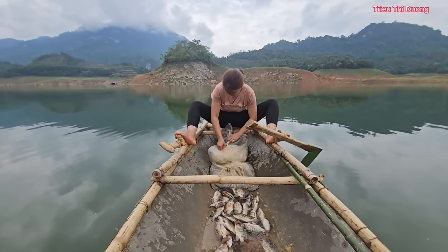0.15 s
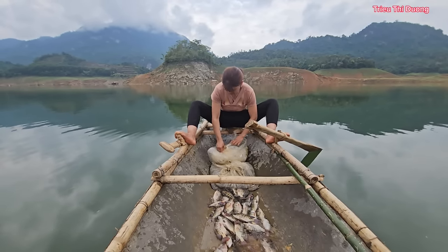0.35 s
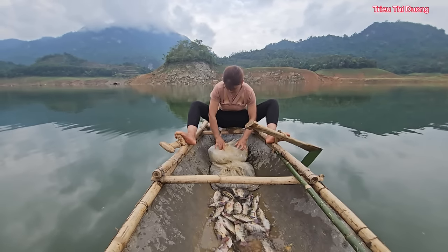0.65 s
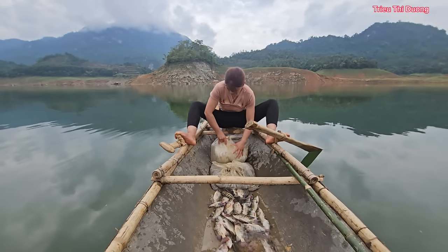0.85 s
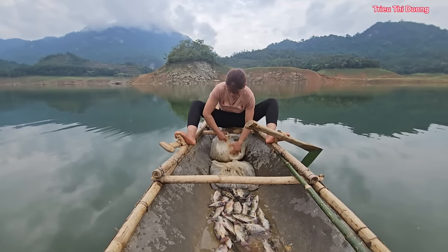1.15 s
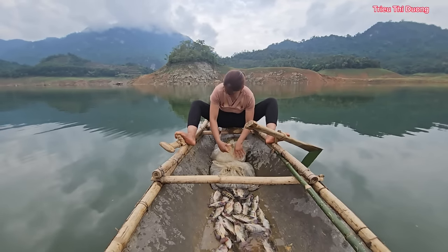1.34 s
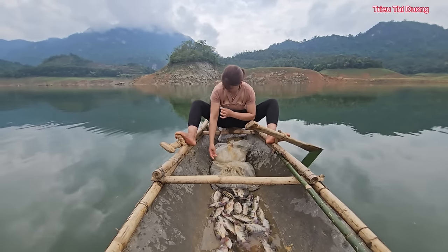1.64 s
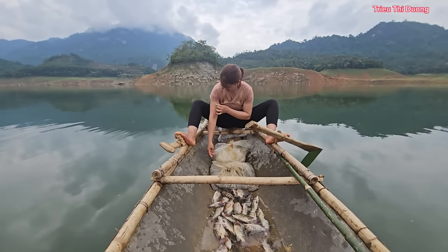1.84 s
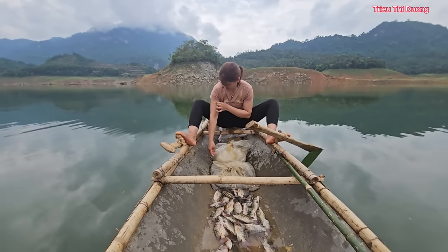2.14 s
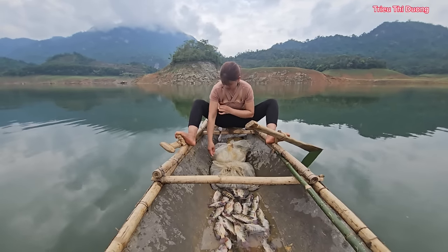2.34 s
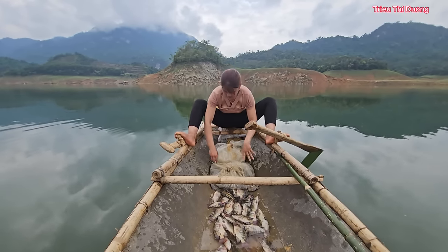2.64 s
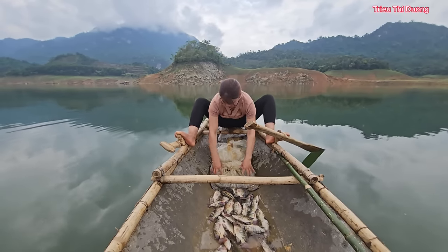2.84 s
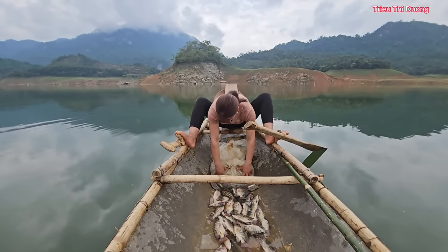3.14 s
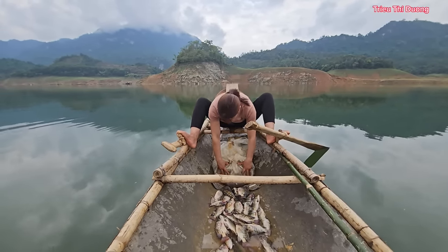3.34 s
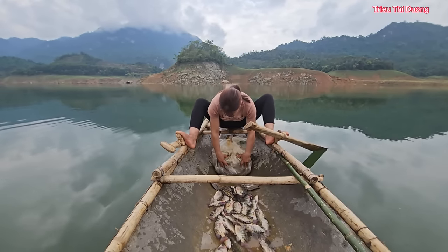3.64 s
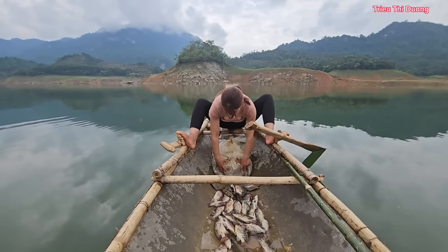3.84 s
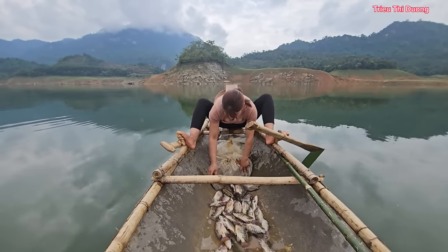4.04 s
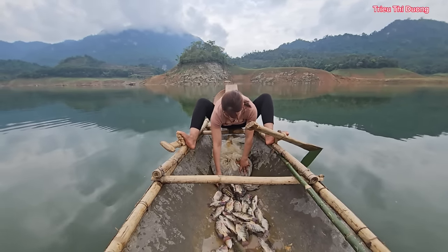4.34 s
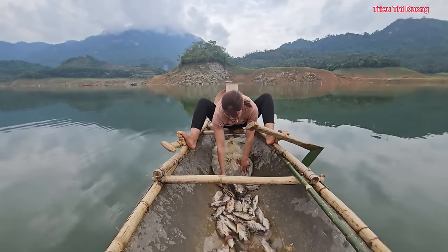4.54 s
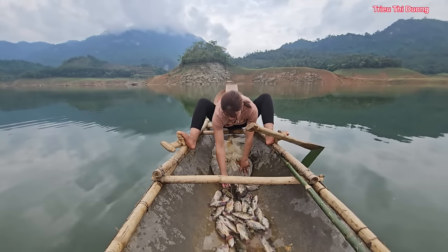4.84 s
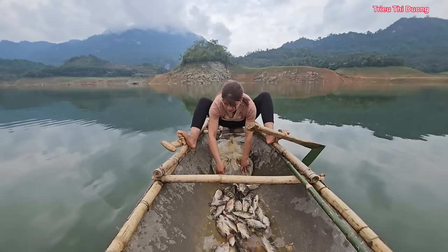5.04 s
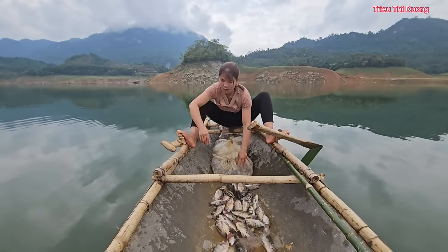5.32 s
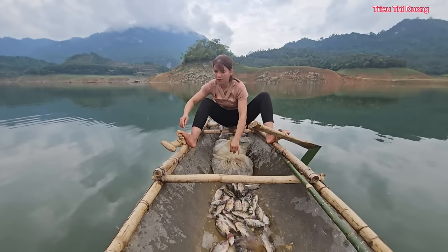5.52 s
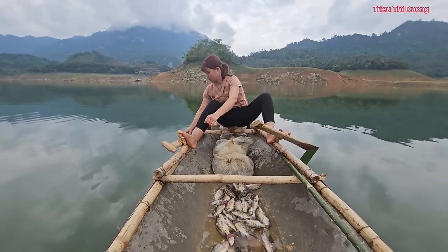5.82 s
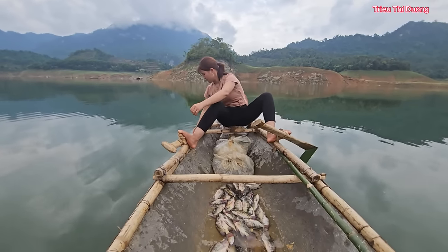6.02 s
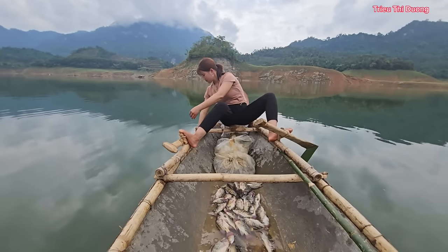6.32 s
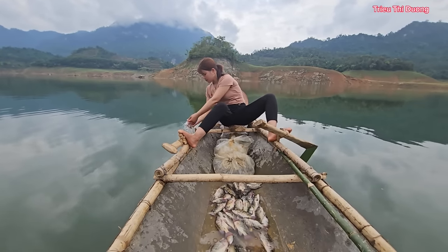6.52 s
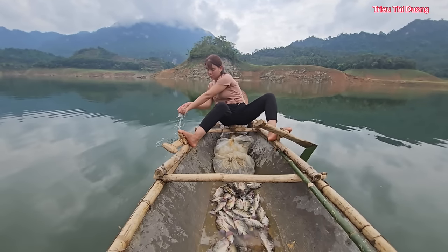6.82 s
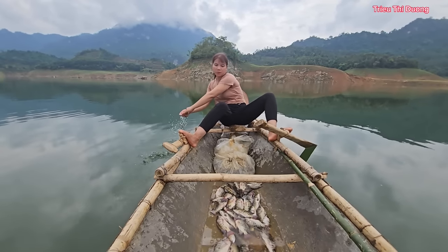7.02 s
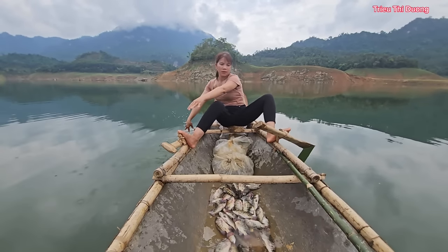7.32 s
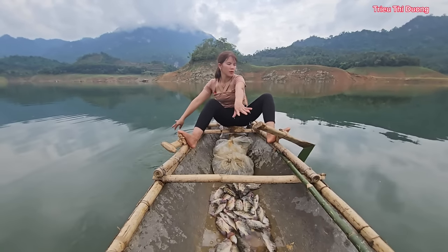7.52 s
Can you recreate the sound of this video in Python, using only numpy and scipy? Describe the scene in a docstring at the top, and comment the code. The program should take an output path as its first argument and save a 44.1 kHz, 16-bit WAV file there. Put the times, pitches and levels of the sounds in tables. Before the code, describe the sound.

Near microphones in a small boat on an open lake catch sodden net being pushed about, with fizzing wet crackle, sharp ticks and dull hull thumps, loudest early and again more gently midway. Plops and tiny bubbles follow as water drains, then droplets patter and ping from rinsed hands. Far away, an engine putters dully, insects hold a high steady shrill, birds whistle faintly and a low wavering hum rises late.

```python
"""Wet net in a small boat

A wet fishing net is shoved along the floor: shaped clicks rumble and ring in the hull, torn noise squelches.
Drips and plops are damped rings with bursts of noise; droplets and bubbles trickle off hands rinsed over the side.
Behind them, narrow bands of noise shrill as insects, gliding tones call as birds, a slow row of pulses
thuds as a far boat engine, and a low wavering hum rises late over soft air noise."""
import sys
import numpy as np
from scipy import signal
from scipy.fft import rfft, irfft
from scipy.io import wavfile
from scipy.ndimage import uniform_filter1d

SR = 44100
rng = np.random.default_rng(int(sys.argv[2]) if len(sys.argv) > 2 else 0)


def wav_out(sig):
    """Save sig, one row per channel (or a flat mono array), as 16-bit PCM at SR to the path in sys.argv[1]."""
    wavfile.write(sys.argv[1], SR, np.round(np.clip(np.atleast_2d(sig).T, -1, 1) * 32767).astype(np.int16))


N = 338247
TIME = np.arange(N) / SR

# stereo width of near sounds, the usual choice in ports(): (frequency [Hz], relative side level [dB])
NEAR_WIDTH = [(60, -23), (200, -24), (400, -18), (750, -16), (1300, -9), (2400, -3), (4400, 0), (16000, 0)]


def amp(db):
    """Turns decibels into a gain."""
    return 10 ** (np.asarray(db) / 20)


def unit(x):
    """Scales a sound to an average (rms) strength of 1."""
    return x / np.sqrt(np.mean(x ** 2) + 1e-20)


def read(points, hz):
    """Reads a table between its points, on a log-frequency axis."""
    f, value = np.transpose(points)
    return np.interp(np.log(hz + 1), np.log(f + 1), value)


def level(rows):
    """Gain over time from (time [s], level [dB]) points."""
    return amp(np.interp(TIME, *np.transpose(rows)))


def add(mix, s, sound):
    """Mixes a sound in at time s, in seconds."""
    part = mix[max(round(s * SR), 0):][:len(sound)]
    part += sound[:len(part)]


def colour(x, spectrum, size=4096):
    """Filter of unit energy that shapes the spectrum: each click rings after it, never before."""
    hz = abs(np.fft.fftfreq(size, 1 / SR))
    log_gain = np.log(amp(read(spectrum, hz)) + 1e-5)
    # the Hilbert transform gives the phase that packs the ring right after the click
    ring = np.fft.ifft(np.exp(np.conj(signal.hilbert(log_gain)))).real[:size // 2]
    return signal.oaconvolve(x, ring / np.linalg.norm(ring))[:len(x)]


def grains(per_s, spread_db, smooth_s):
    """Random clicks of very unequal size, evened out to a nearly steady mean power."""
    chance = rng.random(N)
    size = np.minimum(rng.exponential(1, N), 5)
    sign = rng.choice([-1, 1], N)
    clicks = (chance < per_s / SR) * amp(spread_db * size) * sign
    power = abs(uniform_filter1d(clicks ** 2, int(smooth_s * SR) + 1))
    return clicks / np.sqrt(power + 1e-4)


def bursts(per_s, spread_db, smooth_s, burst_s):
    """Grains stretched into tiny bursts of noise, each swelling and fading over a millisecond or so."""
    t = np.arange(SR // 50) / SR
    shape = t * np.exp(-t / burst_s)
    clicks = grains(per_s, spread_db, smooth_s)
    power = signal.oaconvolve(clicks ** 2, shape / shape.sum())[:N]
    return unit(np.sqrt(abs(power)) * rng.standard_normal(N))


def waver(smooth_s):
    """Smoothed random wandering of rms 1."""
    wander = uniform_filter1d(rng.standard_normal(N), int(smooth_s * SR) + 1)
    return unit(uniform_filter1d(wander, 256))


def bubble(hz, cycles, rise, soft=1):
    """A damped ring whose pitch rises as the bubble nears the surface."""
    life = cycles / hz
    t = np.arange(int(6 * life * SR)) / SR
    tone = np.sin(2 * np.pi * hz * t * (1 + rise * t / life / 2))
    ring = tone * np.exp(-t / life) * (1 - np.exp(-t * hz / soft))
    return ring / abs(ring).max()


def bubbles(low_hz, high_hz, per_s, spread_db, cycles, count=24):
    """Random bubbles of many sizes; some ring, others only click."""
    out = np.zeros(N)
    shapes = []
    for hz in np.geomspace(low_hz, high_hz, count):
        ring = bubble(hz, cycles * rng.uniform(.3, 1.6), rise=.03)
        shapes.append(ring * (hz / low_hz) ** .35)
    chance = rng.random(N)
    size = np.minimum(rng.exponential(1, N), 3.5)
    which = rng.integers(0, count, N)
    for at in np.flatnonzero(chance < per_s / SR):
        add(out, at / SR, amp(spread_db * size[at]) * shapes[which[at]])
    return unit(out)


def hull(x, ring_db):
    """The boat's floor rings on after whatever shakes it: a sum of fading tones."""
    # the floor's ringing tones: (frequency [Hz], relative level [dB], time to fade by 60 dB [s])
    hull_modes = [(170, -7.5, 0.03), (269, -10, 0.35), (502.5, -2, 0.14), (689, 1, 0.042),
                  (786, -1.5, 0.027), (950, -17, 0.074), (1040, 0, .06), (2310, -16, 0.022)]
    t = np.arange(SR // 4) / SR
    ring = np.zeros(len(t))
    for hz, db, t60 in hull_modes:
        even_gain = 2 * np.log(1000) / (t60 * SR)  # long and short rings peak alike
        ring += amp(db - 60 * t / t60) * np.cos(2 * np.pi * hz * t) * even_gain
    return x + amp(ring_db) * signal.oaconvolve(x, ring)[:N]


def stroke(start, length, rise_s, settle_s):
    """Gain of one hand movement: it takes hold, lasts, and dies away almost exponentially."""
    t = np.maximum(TIME - start, 0)
    take_hold = 1 - np.exp(-(t / rise_s) ** 2)
    return take_hold * np.exp(-(np.maximum(t - length, 0) / settle_s) ** 0.98)


def handling():
    """How hard the net drags, squelches and snaps over time: each push builds while it lasts."""
    # pushes of the net: (start [s], push length [s], take-hold time [s], settling time [s],
    # relative drag level [dB], relative squelch level [dB], relative snapping level [dB])
    shoves = [(-0.02, 0.17, 0.011, .04, -62.5, -60, -58), (0.083, 0.11, 0.039, 0.12, -52.5, -55, -74),
              (0.278, 0.083, 0.0091, 0.14, -52, -51.5, -61), (0.551, 0.038, 0.025, 0.23, -56, -53, -71),
              (0.702, 0.13, 0.034, 0.088, -48.5, -51, -66), (0.84, 0.14, 0.026, 0.078, -45, -49, -63),
              (1.023, 0.037, 0.019, 0.014, -40.5, -48.5, -60),
              (1.063, 0.19, 0.0096, 0.035, -28.5, -47, -49.5),
              (1.273, 0.078, .015, 0.051, -44.5, -49.5, -61), (1.384, 0.049, .02, 0.015, -50.5, -55.5, -75),
              (2.969, 0.11, 0.069, 0.078, -42, -45, -62), (3.234, 0.2, 0.037, 0.025, -51, -55, -61),
              (3.383, 0.23, 0.025, 0.005, -39, -50.5, -58.5), (3.605, 0.044, 0.034, 0.031, -34, -46.5, -56),
              (3.755, 0.19, 0.045, 0.022, -51, -57, -67), (3.954, 0.059, 0.012, 0.045, -53, -58.5, -62),
              (4.238, 0.725, 0.038, 0.047, -69, -87, -90), (5.063, 0.048, 0.0053, 0.015, -54, -66.5, -72),
              (5.124, 0.16, 0.012, 0.042, -58, -62, -83), (5.208, .02, .008, 0.04, -53.5, -55.5, -82)]
    swell_db_per_s = 10
    power = np.zeros((3, N))
    for start, length, rise_s, settle_s, *levels_db in shoves:
        swell_db = swell_db_per_s * (np.clip(TIME - start, 0, length) - length / 2)
        push = stroke(start, length, rise_s, settle_s) * amp(swell_db)
        power += np.outer(amp(levels_db), push) ** 2
    uneven_grip = amp(0.5 * waver(0.025))
    return np.sqrt(power) * uneven_grip


def drag(force):
    """The net sticks and slips on the floor; a hard shove brings out the middle of the hull's range."""
    # spectrum when pressed hard: (frequency [Hz], relative level per Hz [dB])
    heavy_spectrum = [(53, -45.5), (90, -19), (220, -1.5), (255, 4), (323, -9), (472, -1), (606, -2),
                      (778, -10.5), (914, -7.5), (1060, -6), (1160, -10.5), (1820, -23), (2110, -13),
                      (2550, -34.5), (3000, -21.5), (3900, -85), (6600, -120)]
    # spectrum when pressed lightly: (frequency [Hz], relative level per Hz [dB])
    light_spectrum = [(65, -40), (110, -6), (134, -6.5), (234, 4), (274, 0.5), (334, -2), (430, -2),
                      (867, -13.5), (1610, -9), (1920, -74.5), (2190, -7), (2600, -48.5), (3380, -30),
                      (5720, -120)]
    hard = 1 / (1 + (amp(-43.5) / (force + 1e-9)) ** 2)  # 0 is light, 1 is hard
    heavy_slips = colour(grains(1400, 2.8, 0.017), heavy_spectrum)
    heavy = unit(hull(heavy_slips, ring_db=-0.5))
    light_slips = colour(grains(1500, 3.1, 0.039), light_spectrum)
    light = unit(hull(light_slips, ring_db=2.5))
    return force * (np.sqrt(hard) * heavy + amp(2.5) * np.sqrt(1 - hard) * light)


def squelch(rubbing, snapping):
    """Wet strands rub with a dense fizz while films of water snap between them."""
    # spectrum of the rubbing mesh: (frequency [Hz], relative level per Hz [dB])
    mesh = [(500, -36.5), (1200, 3), (2100, 1), (2550, -3.5), (3000, 0.5), (4000, -3), (5500, -4),
            (7500, -5.5), (9000, -10), (10200, -20.5), (11500, -11.5), (16000, -16)]
    # spectrum of the snapping films: (frequency [Hz], relative level per Hz [dB])
    films = [(2000, -23.5), (4500, -5), (7500, 2.5), (9000, 4), (10200, -5.5), (11500, 11), (13000, -7),
             (16000, 12)]
    fizz = unit(colour(bursts(per_s=1600, spread_db=4.5, smooth_s=0.096, burst_s=0.00085), mesh))
    snaps = unit(colour(bursts(per_s=350, spread_db=11, smooth_s=0.07, burst_s=0.00035), films))
    return rubbing * fizz + snapping * snaps


def seep(rubbing, rinse):
    """Water drains in the net and round the hands: wet crackle with small bubbles in it."""
    # spectrum of the crackle: (frequency [Hz], relative level per Hz [dB])
    crackle_spectrum = [(350, -15), (600, 9), (1500, 3.5), (3200, -25), (5000, -0.5), (8000, -5),
                        (10000, -20), (16000, -30)]
    usual_squelch_db, growth = -51, 0.56  # growth: dB of seeping per dB of squelch
    pressed = amp(-58.5) * (rubbing / amp(usual_squelch_db)) ** growth
    resting, rinsing = amp(-82), amp(-78) * rinse
    flow = np.sqrt(resting ** 2 + pressed ** 2 + rinsing ** 2)
    crackle = unit(colour(bursts(per_s=150, spread_db=2, smooth_s=.12, burst_s=0.00058), crackle_spectrum))
    fizzing = bubbles(low_hz=900, high_hz=5500, per_s=300, spread_db=3.4, cycles=5.5)
    return flow * (amp(-4) * crackle + amp(-1.5) * fizzing)


def engine():
    """One cylinder fires slowly far away: uneven pulses in noise, filtered into dull thuds."""
    # loudness of the engine: (time [s], relative level [dB])
    engine_level = [(0, -59), (6.5, -61), (7.67, -64.5)]
    # spectrum of the exhaust: (frequency [Hz], relative level per Hz [dB])
    exhaust = [(20, -30.5), (42, -3), (60, 4.5), (95, 4.5), (130, 3), (160, 1), (190, -19.5), (260, -9.5),
               (325, -10), (500, -19.5), (750, -18.5), (1200, -49), (3500, -89.5)]
    middle_firing_hz = 13.2
    turns = np.cumsum(middle_firing_hz * (1 + 0.013 * waver(0.39))) / SR
    # one pulse at each whole turn, each of a slightly different strength
    pulses = np.diff(np.floor(turns), prepend=0) * (1 + 0.16 * rng.standard_normal(N))
    thuds = unit(colour(unit(pulses) + 1.6 * rng.standard_normal(N), exhaust))
    return amp(2) * level(engine_level) * thuds


def insects():
    """Many shrilling insects merge into a narrow band that drifts and flutters, with weak upper bands."""
    # loudness of the insects: (time [s], level [dB])
    insect_level = [(0, -66), (2.9, -66.5), (4.3, -68), (6.3, -68), (7.67, -71)]
    # bands of noise before they drift: (middle frequency [Hz], width [Hz], relative level [dB])
    shrill = [(4638, 187, 3), (5400, 430, -20.5), (7500, 440, -22)]
    hz = np.fft.rfftfreq(N, 1 / SR)
    bands = sum(amp(db) / (1 + (2 * (hz - f) / width) ** 4) ** 0.71 for f, width, db in shrill)
    chorus = signal.hilbert(irfft(rfft(rng.standard_normal(N)) * bands, N))
    drift = np.exp(2j * np.pi * np.cumsum(22 * waver(.25)) / SR)  # wanders by some 22 Hz
    flutter = amp(0.24 * waver(0.024))
    return level(insect_level) * unit((chorus * drift).real * flutter)


def open_air():
    """Steady, soft filtered noise fills the background."""
    # spectrum of the air noise: (frequency [Hz], relative level per Hz [dB])
    air_spectrum = [(20, -0.5), (60, -11), (200, 13), (500, 11), (1000, -3), (2000, -11.5), (3200, -9.5),
                    (4400, -0.5), (6300, -17.5), (9500, -57), (11500, -21.5), (16000, -33.5)]
    return amp(-69.5) * unit(colour(rng.standard_normal(N), air_spectrum))


def ticks():
    """Sharp ticks of drops and strands: single very short bursts of bright noise."""
    # the ticks: (time [s], relative level [dB])
    tick_times = [(0.0567, -54), (0.0717, -39), (0.6647, -39), (0.7425, -30.5), (0.869, -28.5),
                  (0.9456, -30), (1.2509, -23), (1.3412, -29.5), (1.5503, -46), (3.2204, -33), (3.344, -31),
                  (3.885, -35), (4.065, -48), (4.53, -51), (4.956, -49.5), (5.176, -38), (5.2194, -32.5),
                  (5.3304, -46), (6.138, -52.5), (6.591, -43), (6.773, -37), (6.9441, -32), (7.2117, -43),
                  (7.334, -45.5)]
    # spectrum of a tick: (frequency [Hz], relative level per Hz [dB])
    tick_spectrum = [(1200, -106), (3000, 15.5), (7500, 19), (10000, 8.5), (12000, 11), (16000, 9)]
    out = np.zeros(N)
    t = np.arange(SR // 100) / SR
    for s, db in tick_times:
        snap = rng.standard_normal(len(t)) * (1 - np.exp(-t / 0.0012)) * np.exp(-t / 0.0028)
        add(out, s, amp(db - 5.0) * snap)
    return colour(out, tick_spectrum)


def bumps():
    """The net's weights knock on the floor: short dull rings that set the hull ringing."""
    # the knocks: (time [s], relative level [dB], frequency [Hz])
    knocks = [(0.296, -34, 269), (0.356, -41, 222), (0.96, -26.5, 254), (1.074, -16.5, 448),
              (1.131, -21, 735), (1.161, -16.5, 623), (1.173, -15, 800), (1.199, -19, 826),
              (1.228, -15, 770), (1.271, -14.5, 549), (1.407, -33, 247.6), (3.244, -36.5, 220),
              (3.313, -33, 540), (3.407, -23.5, 622), (3.552, -22.5, 650), (3.595, -21, 345),
              (3.667, -25, 715), (3.7, -25, 246), (3.769, -37, 266), (3.931, -32, 613), (5.39, -37, 236)]
    out = np.zeros(N)
    for s, db, hz in knocks:
        add(out, s, amp(db - 8) * bubble(hz, cycles=2.26, rise=0.003, soft=1.3))
    return hull(out, ring_db=5)


def drips(count=24):
    """Faint plops at loosely even random times, as rows like those of the plop table."""
    # stray drips off the net, then off the hands: (start [s], end [s], drips per second [1/s],
    # middle bubble level [dB], middle spray level [dB]), both levels relative
    dripping = [(4.15, 5.05, 14, -58, -49), (6.38, 7.3, 8, -57.5, -65)]
    low_hz, high_hz, spread_db = 930, 4430, 16  # range of pitches, and full range of levels
    rows = []
    for start, end, per_s, db, spray_db in dripping:
        for k, (when, size, pitch, spray) in enumerate(rng.random((count, 4))):
            s = start + (k + when) / per_s
            if s < end:
                bubble_db = db + spread_db * (size - .5)
                hz = low_hz * (high_hz / low_hz) ** pitch
                rows.append((s, bubble_db, hz, spray_db + spread_db * (spray - .5)))
    return rows


def plops():
    """Each plop is a spatter and a main bubble; further bubbles, mostly higher, break off from it."""
    # the plops: (time [s], relative bubble level [dB], bubble frequency [Hz], relative spray level [dB])
    plop_rows = [(0.298, -47, 1400, -39), (0.425, -41.5, 3050, -55), (0.743, -40.5, 1650, -33),
                 (1.551, -48, 2820, -37), (2.351, -52.5, 966, -29.5), (3.016, -40.5, 1120, -41),
                 (3.246, -42.5, 1066, -24.5), (3.314, -40, 1575, -30), (3.347, -39.5, 1170, -26),
                 (3.766, -47, 614, -30.5), (3.931, -37.5, 1354, -29), (3.987, -43, 957, -22.5),
                 (4.027, -49, 2280, -31), (4.117, -43, 717, -31.5), (4.359, -41.5, 3420, -41),
                 (4.402, -50, 2900, -37.5), (4.466, -54, 1170, -37.5), (4.533, -58, 1290, -35.5),
                 (4.648, -46.5, 1515, -56), (4.775, -48, 1310, -31), (4.8, -48, 2270, -27),
                 (4.889, -51.5, 3550, -57), (4.951, -55, 866, -46), (5.075, -50, 554, -40),
                 (5.098, -47, 2710, -55), (5.222, -55, 1095, -32), (5.308, -47, 2940, -58),
                 (5.496, -55, 980, -42), (5.728, -64, 960, -39.5), (6.16, -57, 3500, -66),
                 (6.181, -49, 956, -58), (6.196, -53, 1450, -58), (6.295, -59.5, 2090, -46),
                 (6.392, -46, 1470, -40), (6.403, -43.5, 834, -41), (6.509, -51, 1495, -57),
                 (6.594, -45, 691, -34.5), (6.698, -45.5, 900, -45), (6.735, -45.5, 3500, -36),
                 (6.77, -50, 1035, -59), (6.871, -43, 4900, -62), (7.004, -39.5, 3520, -43),
                 (7.055, -51.5, 926, -30), (7.15, -45, 3860, -59), (7.209, -54, 1280, -35)]
    # spectrum of the spatter: (frequency [Hz], relative level per Hz [dB])
    spray_spectrum = [(300, -1.5), (800, 3), (2500, 1), (4000, -4.5), (8000, -19), (10000, -27),
                      (15000, -27)]
    out, spatter = np.zeros(N), np.zeros(N)
    t = np.arange(SR // 12) / SR
    swell = (1 - np.exp(-t / 0.00098)) * np.exp(-t / 0.0041)
    for s, db, hz, spray_db in plop_rows + drips():
        main = bubble(hz, cycles=3 + 3 * rng.random(), rise=0.05, soft=1.1)
        add(out, s, amp(db - 2.5) * main)
        for late, pitch, size, ring in rng.random((8, 4)):
            small_hz = hz * 2 ** (1.1 * pitch + .5 * late - .3)
            small = bubble(small_hz, cycles=2.5 + 6 * ring, rise=.05)
            add(out, s + .04 * late ** 2, amp(db - 6 - 8 * size - 6 * late) * small)
        add(spatter, s, amp(spray_db - 14) * swell * rng.standard_normal(len(t)))
    return out + colour(spatter, spray_spectrum)


def birds(echo_db=-5, t60=0.38):
    """Soft gliding whistles far away, blurred by a fading echo from the shore."""
    # the calls: (time [s], length [s], start frequency [Hz], middle frequency [Hz],
    # end frequency [Hz], relative level [dB])
    calls = [(1.97, 0.06, 2900, 3340, 3880, -87.5), (2.016, 0.073, 3260, 2900, 2540, -89),
             (2.395, 0.051, 1430, 1410, 1370, -84), (2.488, 0.088, 3230, 2770, 2600, -89),
             (2.533, 0.093, 1314, 1340, 1340, -85), (2.734, 0.14, 1580, 1757, 1580, -76.5),
             (2.74, 0.136, 780, 829, 790, -79), (2.896, 0.14, 3250, 2960, 3000, -82),
             (4.143, 0.18, 1430, 1407, 1330, -79.5), (5.684, 0.03, 3080, 3440, 4100, -82.5)]
    out = np.zeros(N)
    for s, length, start, middle, end, db in calls:
        u = np.linspace(0, 1, int(length * SR))
        glide = np.polyval(np.polyfit([0, .5, 1], [start, middle, end], 2), u)  # smooth curve
        tremble = unit(uniform_filter1d(rng.standard_normal(len(u)), 150))
        hz = glide * (1 + 0.013 * tremble)
        whistle = np.sin(2 * np.pi * np.cumsum(hz) / SR) * np.sin(np.pi * u)
        add(out, s, amp(db + 3) * unit(whistle))
    t = np.arange(SR // 3) / SR
    tail = rng.standard_normal(len(t)) * amp(-60 * t / t60)
    return out + amp(echo_db) * signal.oaconvolve(out, tail / np.linalg.norm(tail))[:N]


def hum(low_hz=140, high_hz=360):
    """A low wavering tone with a fainter one above it."""
    # loudness of the hum: (time [s], level [dB])
    hum_level = [(0, -80), (5.2, -76), (5.55, -62), (5.95, -60.5), (6.5, -64.5), (7.67, -67)]
    low = np.sin(2 * np.pi * np.cumsum(low_hz * (1 + 0.01383 * waver(0.1276))) / SR)
    high = np.sin(2 * np.pi * np.cumsum(high_hz * (1 + 0.078 * waver(0.0594))) / SR)
    return level(hum_level) * unit(low + amp(-11.5) * high)


def trickle(rinse):
    """Separate droplets slap the lake and trap tiny pinging bubbles; the hands stir up larger ones."""
    # spectrum of the slapping droplets: (frequency [Hz], relative level per Hz [dB])
    droplets = [(600, -8), (1200, -4), (2500, -36), (4000, 14.5), (6000, 8), (8500, 6), (10200, -10),
                (11500, 5.5), (16000, -3.5)]
    slaps = unit(colour(bursts(per_s=220, spread_db=3.8, smooth_s=.1, burst_s=.0004), droplets))
    pings = bubbles(low_hz=1800, high_hz=9000, per_s=260, spread_db=3.3, cycles=8)
    gurgle = bubbles(low_hz=750, high_hz=3000, per_s=110, spread_db=3, cycles=7)
    return amp(-63) * rinse * (slaps + amp(-6) * pings + amp(-8) * gurgle)


def ports(x, left_db, width=NEAR_WIDTH, size=128):
    """Two microphone ports: bass nearly alike, treble scattered differently into each."""
    hz, _, z = signal.stft(x, SR, nperseg=size)
    scatter = np.sqrt(2) * np.exp(2j * np.pi * rng.random(z.shape))  # random phases
    spread = z * scatter * amp(read(width, hz))[:, None]
    side = signal.istft(spread, SR, nperseg=size)[1][:N]
    return np.array([(x + side) * amp(left_db / 2), (x - side) * amp(-left_db / 2)])


def boat_echo(x, wet_db, t60):
    """Brief reflections between the sides of the boat: sparse random echoes that fade fast."""
    t = np.arange(SR // 6) / SR
    strength = rng.standard_normal((2, len(t)))
    chosen = rng.random((2, len(t))) < 2500 / SR  # about 2500 echoes per second
    taps = strength * chosen * (t > .002) * amp(-60 * t / t60)
    taps /= np.linalg.norm(taps, axis=1, keepdims=True)
    return x + amp(wet_db) * signal.oaconvolve(x, taps, axes=1)[:, :N]


def scene():
    """Net and water close by, the lake and its shore behind."""
    # hands rinsed over the side: (start [s], length [s], rise time [s], run-off time [s])
    rinse_stroke = (6.372, 0.7, 0.36, 0.22)
    # stereo width of far sounds: (frequency [Hz], relative side level [dB])
    far_width = [(60, -21), (120, -19), (200, -11), (380, -6), (700, -1), (1300, 0), (16000, 0)]
    force, rubbing, snapping = handling()
    rinse = stroke(*rinse_stroke)
    floor = ports(drag(force) + bumps(), left_db=1.5, size=512)
    wet_net = squelch(rubbing, snapping) + ticks() + plops() + seep(rubbing, rinse)
    water = ports(wet_net, left_db=2.6) + ports(trickle(rinse), left_db=4)
    lake = ports(engine() + hum() + open_air(), left_db=.3, width=far_width, size=1024)
    shore = ports(insects() + birds(), left_db=5, width=far_width, size=2048)
    return floor + boat_echo(water, wet_db=-6.0, t60=0.11) + lake + shore


def record(dry):
    """The recorder's band limit: a steep filter removes what lies above the edge."""
    edge_hz = 15950
    low_pass = signal.firwin(511, edge_hz, window=("kaiser", 9), fs=SR)
    return signal.oaconvolve(dry, low_pass[None], "same")


dry = scene()
out = record(dry)
wav_out(out)
```